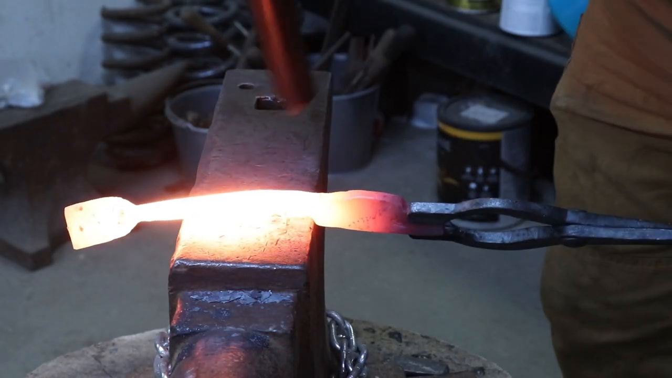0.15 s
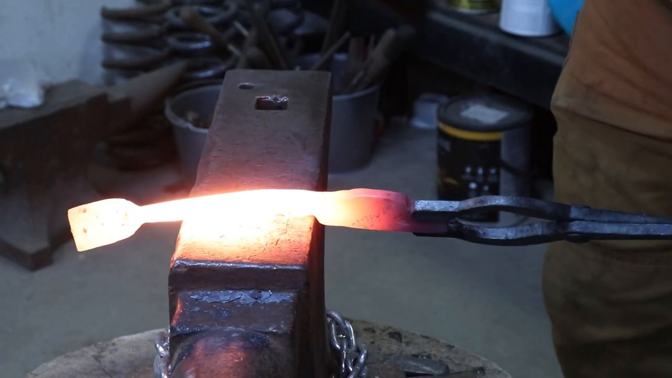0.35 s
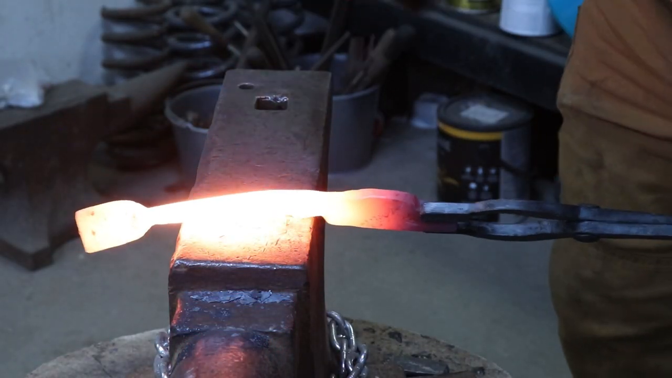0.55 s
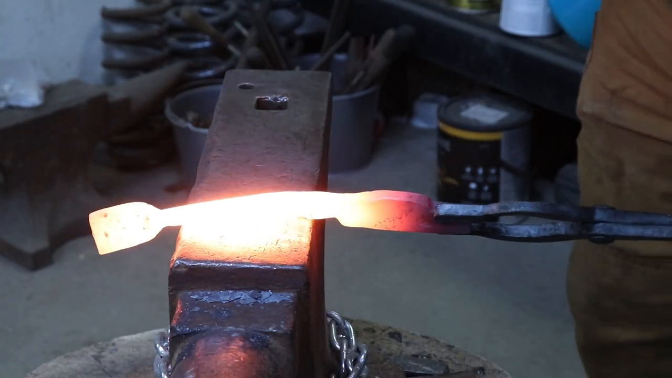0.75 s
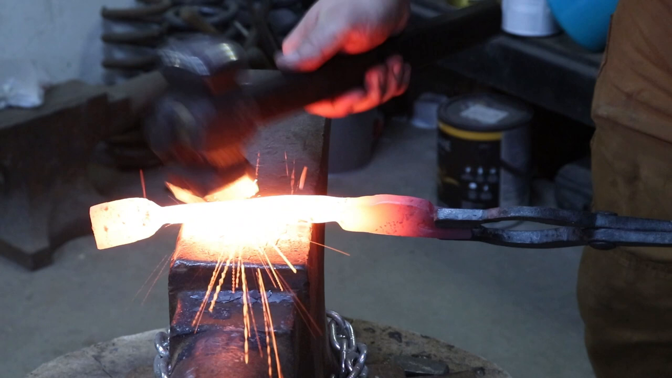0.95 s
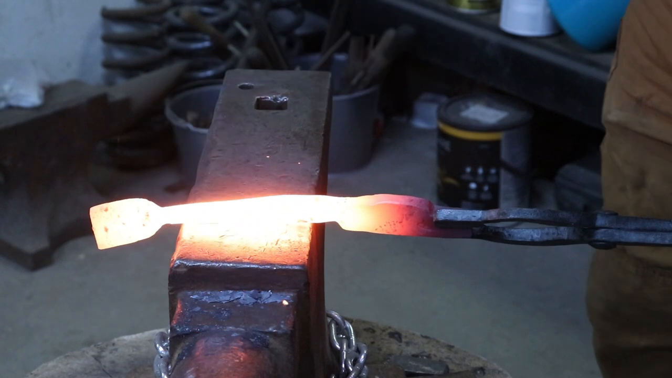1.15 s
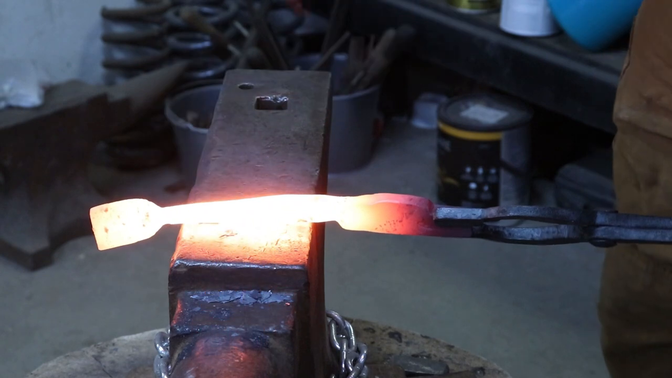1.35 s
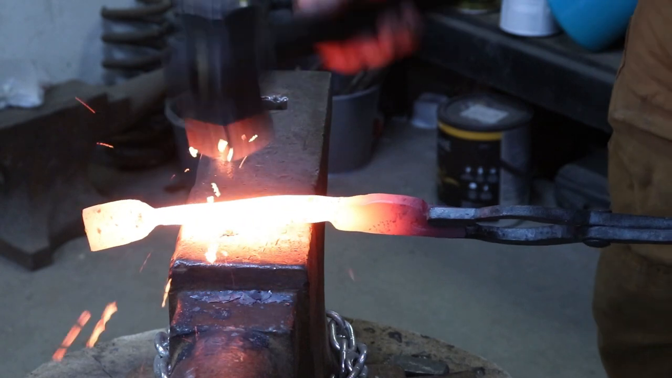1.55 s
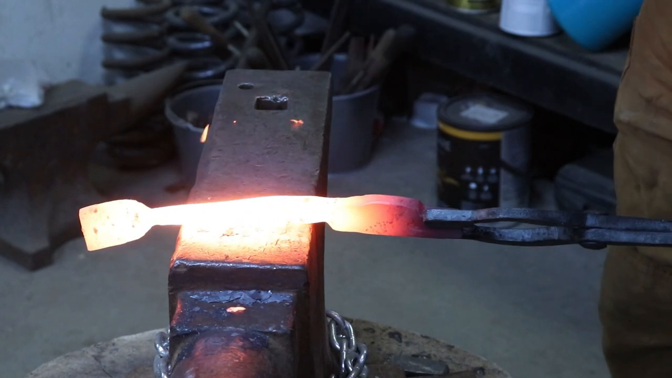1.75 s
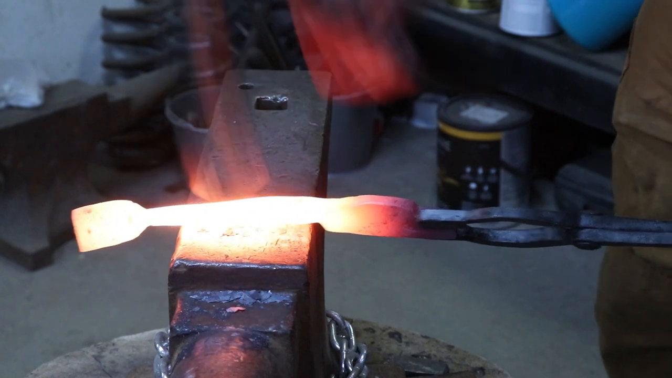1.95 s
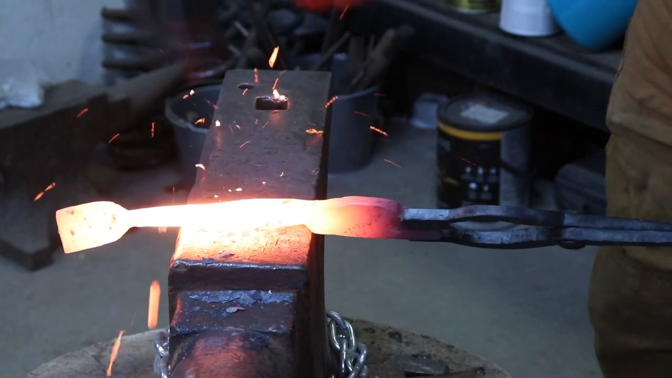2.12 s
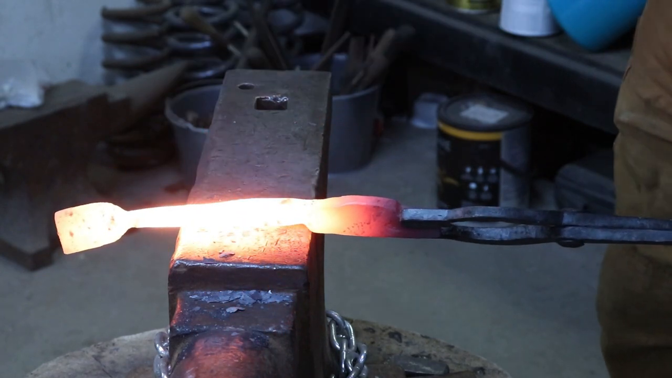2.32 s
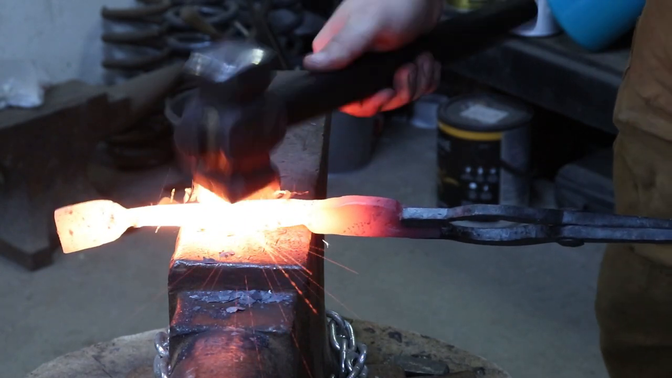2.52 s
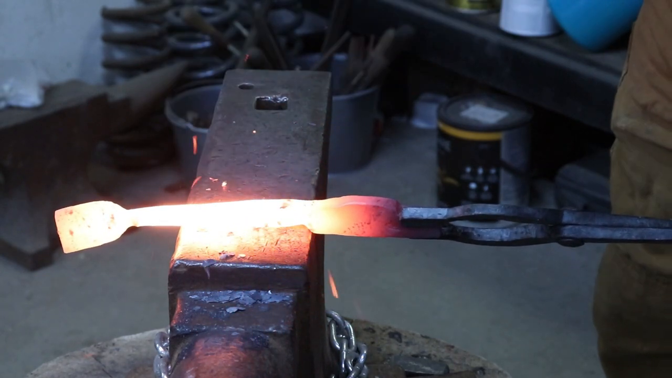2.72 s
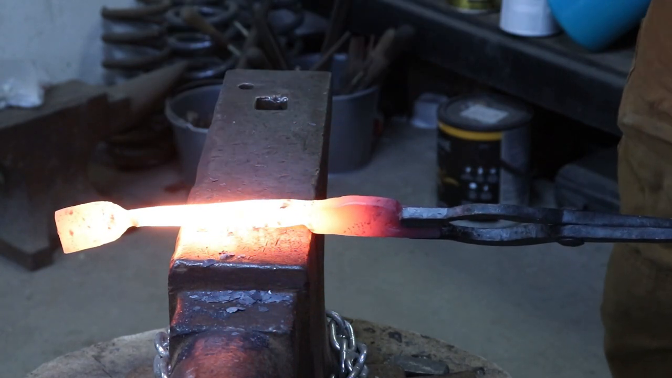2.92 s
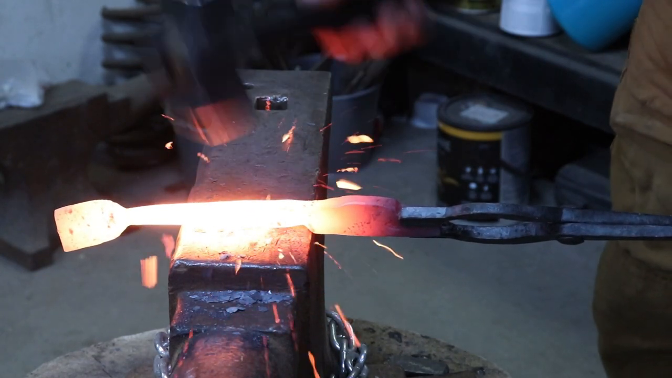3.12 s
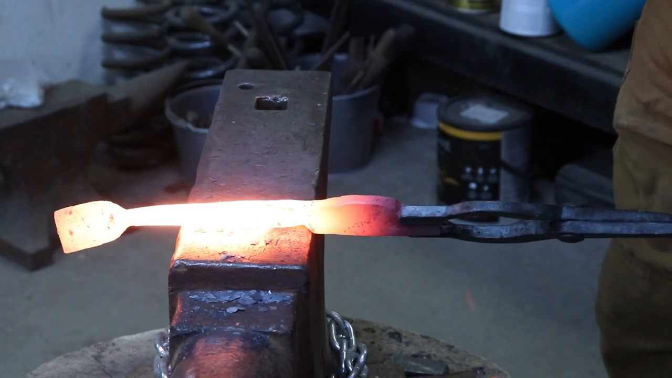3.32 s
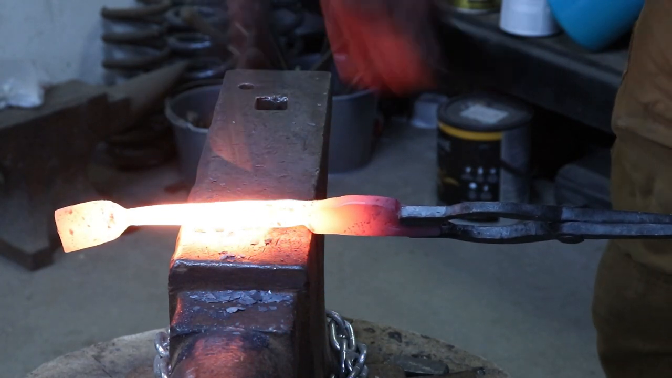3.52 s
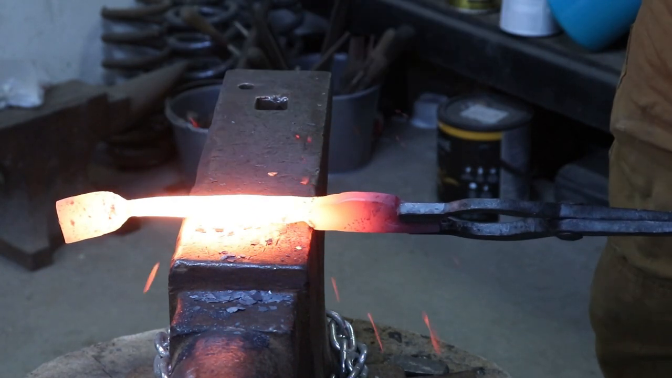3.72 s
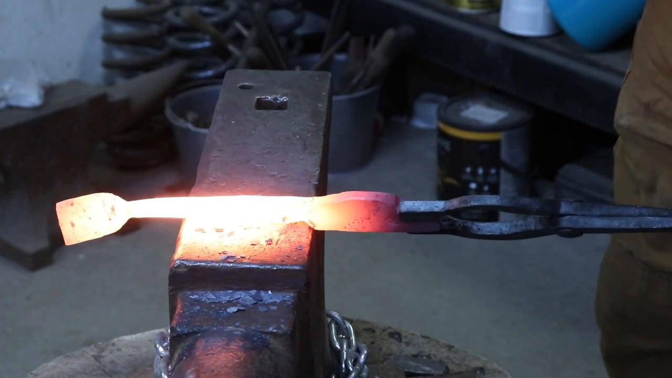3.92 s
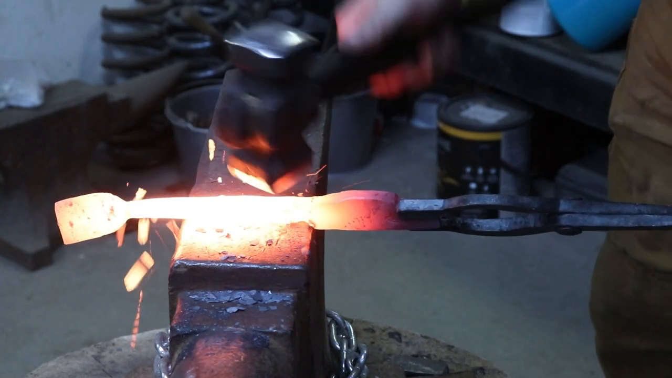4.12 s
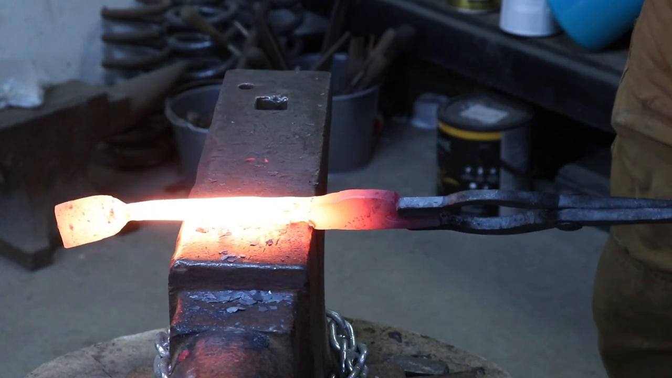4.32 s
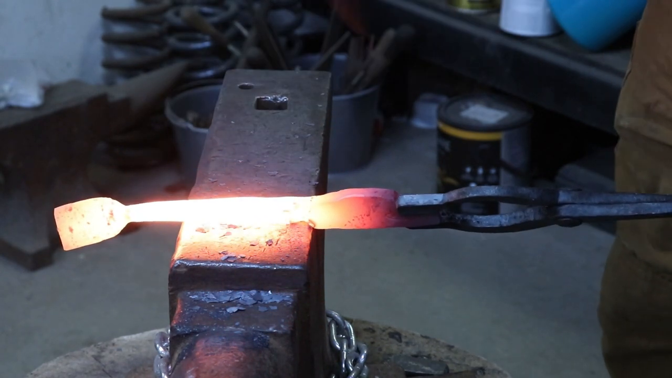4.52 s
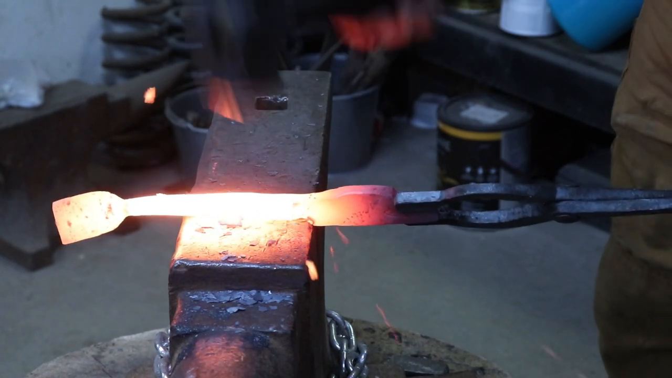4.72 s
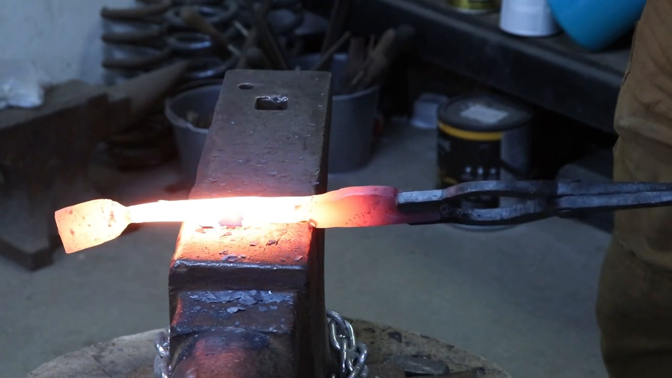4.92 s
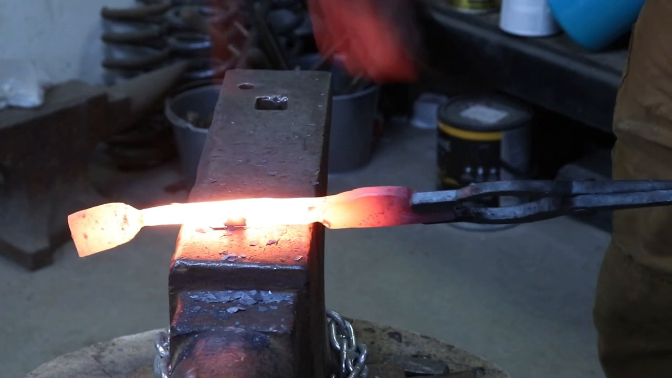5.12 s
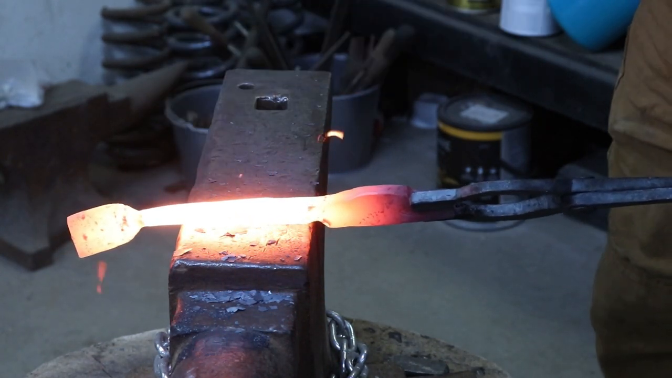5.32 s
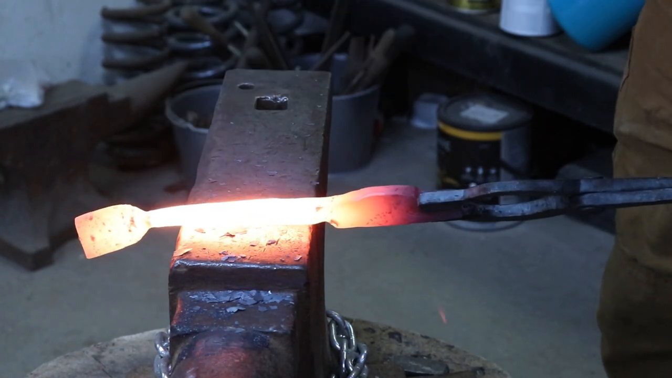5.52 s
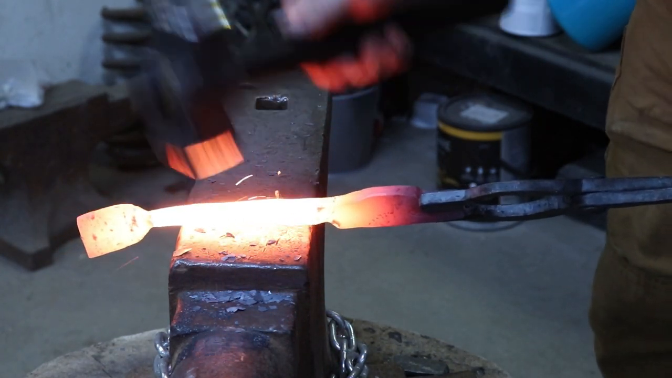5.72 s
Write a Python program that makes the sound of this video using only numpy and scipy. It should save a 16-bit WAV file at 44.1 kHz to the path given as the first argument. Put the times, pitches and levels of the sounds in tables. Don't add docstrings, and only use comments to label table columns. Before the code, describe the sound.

Steady overloaded hammer clanks on an anvil, each with a sharp crack, low thump and short metallic ring, over faint workshop rumble.

```python
import sys
import numpy as np
from scipy import signal
from scipy.fft import rfft, irfft, next_fast_len
from scipy.io import wavfile
from scipy.ndimage import map_coordinates

SR = 44100
rng = np.random.default_rng(int(sys.argv[2]) if len(sys.argv) > 2 else 0)


def field_ratio(decibels):
    return 10 ** (np.asarray(decibels, dtype=float) / 20)


def master_out(mix):
    frames = np.transpose(np.atleast_2d(mix))
    ceiling = np.clip(frames, -1, 1)
    pcm = np.round(ceiling * 32767).astype(np.int16)
    wavfile.write(sys.argv[1], SR, pcm)


N = 254016

# t/s, force/dB, hardness/(dB per octave), spot along and across the face/hand widths
BLOWS = [
    (0.121, -10.5, 2, -0.75, 0.49),
    (1.0302, -6.5, -6, -0.42, 0.18),
    (1.5606, -4.5, -0.56, -.49, -0.82),
    (2.0707, -3.5, -2.5, -0.36, 0.26),
    (2.6049, -3.5, 2.56, 0.52, -0.036),
    (3.1235, -4, 1.35, 0.51, -0.16),
    (3.6429, -4, 0.8, 0.5, -0.13),
    (4.1738, -4, 2.5, 0.27, 0.34),
    (4.711, -3.5, 2.4, 0.3, -0.16),
    (5.2517, -4, 1.5, -0.13, 0.15),
]
NOISE_SPAN = SR * 2 // 3


def along(points, hz):
    f, value = np.transpose(points)
    return np.interp(np.log(hz + 1), np.log(f + 1), value)


def noise(n, spectrum):
    m = next_fast_len(n)
    colour = field_ratio(along(spectrum, np.fft.rfftfreq(m, 1 / SR)))
    x = irfft(rfft(rng.standard_normal(m)) * colour, m)[:n]
    return x / x.std()


def add(track, s, sound):
    i = round(s * SR)
    track[i:i + len(sound)] += sound[:len(track) - i]


def reverberant(x, rise_s, direct):
    # f/Hz, t60/s
    room_decay = [(60, 0.85), (300, 0.53), (1000, 0.5), (4000, 0.52), (8000, 0.42), (15000, 0.38)]
    hz, t, z = signal.stft(x, SR, nperseg=256)
    fade = field_ratio(-60 * t / along(room_decay, hz)[:, None])
    tail = signal.istft(z * fade, SR, nperseg=256)[1][:len(x)]
    build_up = np.exp(-(np.arange(len(x)) / SR / rise_s) ** 2)
    return tail * (1 - (1 - direct) * build_up)


def ring(modes, rise_s, scatter_db, spin, flicker):
    t = np.arange(SR * 3 // 4, dtype=np.float32)[:, None] / SR
    hz, db, t60 = np.transpose(modes).astype(np.float32)
    size, phase = rng.standard_normal((2, len(hz)), dtype=np.float32)
    bumps = np.exp(-(32 * t[::16] - np.arange(24)) ** 2)
    waver = flicker * bumps @ rng.standard_normal((2, 24, len(hz)))
    sway, slip = np.repeat(waver, 16, axis=1)[:, :len(t)].astype(np.float32)
    fade = np.exp(np.float32(np.log(10) / 20) * (db + scatter_db * size - 60 * t / t60))
    lines = fade * (1 + sway) * np.sin(np.float32(2 * np.pi) * hz * t + spin * phase + slip)
    return lines.sum(1) * (1 - np.exp(-t[:, 0] / abs(rise_s)))


def workshop():
    # f/Hz, level/(dB per Hz)
    air = [(20, -28.5), (45, -14.5), (75, 6), (110, -6), (450, -8.5), (1300, -22), (8000, -33),
           (15500, -43)]
    t = np.arange(N) / SR
    drift = map_coordinates(rng.standard_normal(60), [t * 9])
    return field_ratio(-59 + 1.13 * t + 0.6 * drift) * noise(N, air)


def flakes():
    # t/s, level/dB, length/s
    landings = [(0.509, -61, 0.0051), (0.547, -60, .008), (0.654, -74, .008), (0.714, -53, 0.023),
                (0.893, -54, 0.025), (2.438, -62.5, .012), (2.447, -59.5, 0.023), (3.453, -73, 0.0091),
                (3.472, -52, .012), (3.597, -73, 0.0071), (3.96, -69.5, .008), (3.986, -70, .008),
                (4.576, -53.5, 0.013), (5.588, -64.5, 0.007), (5.753, -63, .012)]
    # f/Hz, level/(dB per Hz)
    scrape = [(800, -30), (1600, -1.5), (4000, -5), (8000, -7), (14000, -13.5)]
    track = np.zeros(N)
    t = np.arange(SR // 10) / SR
    for s, db, length_s in landings:
        add(track, s, field_ratio(db - 27 * (t / length_s) ** 3) * noise(len(t), scrape))
    return track


def swing():
    # f/Hz, level/(dB per Hz)
    swish = [(100, -5.5), (300, 6), (1000, -15.5), (3000, -17.5), (6000, -21), (12000, -32)]
    t = np.arange(N) / SR
    ahead_s = np.array(BLOWS)[1:, :1] - t
    speed = (field_ratio(-60 * np.abs(ahead_s) / .5) * (ahead_s > 0)).sum(0)
    return field_ratio(-52.0) * speed * noise(N, swish)


def stand_thump():
    # f/Hz, level/dB, t60/s
    stand = [(71.8, -21.5, 0.34), (171, -20.5, 0.094), (216.9, -15, 0.55), (228.2, -14, 0.52),
             (278.9, -3.5, 0.38), (294, -1.5, 0.27), (321.6, 3.5, 0.088), (300, -13, 0.59),
             (334.2, -11.5, 0.48), (363, -4.5, 0.31), (420.6, -11.5, 0.37), (467, -19.5, 0.14),
             (537.3, -14.5, 0.076), (685.4, -12, 0.28)]
    track = np.zeros(N)
    for s, force_db, *_ in BLOWS:
        add(track, s + 0.002116, field_ratio(force_db) * ring(stand, 0.0042, 0.99, 0.092, 0.01))
    return track


def clank():
    # f/Hz, level/(dB per Hz)
    body = [(40, -26.5), (150, -3), (400, -1), (900, -3), (1600, -3), (2500, -6), (3000, -33.5)]
    track = np.zeros(N)
    walls = noise(NOISE_SPAN, body)
    for s, force_db, *_ in BLOWS:
        answer = reverberant(walls + 0.082 * noise(NOISE_SPAN, body), 0.002, 0.91)
        add(track, s, field_ratio(-9 + 1.253 * force_db) * answer)
    return track


def crack():
    # f/Hz, level/(dB per Hz)
    edge = [(2000, -37), (2700, -5.5), (4000, -5.5), (6000, -8.5), (9000, -12), (12000, -24), (16000, -31)]
    # f/Hz, level/dB, t60/s
    stray = [(3730, -36, .42), (4230, -42, .35), (4580, -36, .45), (5165, -41, .35), (5630, -40, .3),
             (7680, -40, .25), (8260, -44, .4), (8380, -46, .35), (10245, -48, .33), (11020, -52, .3)]
    track = np.zeros(N)
    for s, _, hardness, *_ in BLOWS:
        edge_db = 0.45 * hardness
        add(track, s, field_ratio(-21 + edge_db) * reverberant(noise(NOISE_SPAN, edge), 0.0024, .45))
        add(track, s, field_ratio(3.5 + edge_db) * ring(stray, .012, 3, 3, .4))
    return track


def struck(families, force_db, hardness, x, y):
    # belly level/dB, waves along and across/half waves, offset/half waves
    mode_shapes = [(6.5, -.53, .13, 0.021), (11, 0.67, -.06, .001), (17, 0.21, 0.77, .34),
                   (19, -.75, 0.26, .21), (12.5, -0.4, .41, -0.15), (19, -0.12, 0.0058, -0.36),
                   (7, 0.1, -0.94, 0.11), (10.5, 0.57, -0.2, 0.074)]
    belly_db, waves_x, waves_y, offset = np.transpose(mode_shapes)
    octaves = np.log2([family[0][0] / 1600 for family in families])
    shape = np.cos(np.pi * (waves_x * x + waves_y * y + offset)) ** 2 + .001
    return belly_db + force_db + hardness * octaves + 10 * np.log10(shape)


def anvil_and_bar():
    # f/Hz, level/dB, t60/s
    bend_1 = [(1610.3, -5, .45), (1599.7, -12, .4), (1605.6, -5, .36), (1627.5, -14, .41), (1592, -18, .45),
              (1611.5, -36, 1.3), (1512, -21, .3)]
    bend_2 = [(2444, -18, .6), (2444, -20, .6), (2436, -33, .45)]
    bend_3 = [(3386, -25, .7), (3484, -30, .3)]
    # f/Hz, level/dB, t60/s
    bar = [(2066, -28, .2), (2074, -37, .5)]
    twist = [(6169, -34, .5), (5568, -33, .37), (6774, -37, .35)]
    face = [(8860, -27, .2), (9125, -33, .3), (7490, -38, .2)]
    horn = [(9625, -28, .8), (15056, -50, .6), (15672, -50, .45)]
    heel = [(13575, -26.5, .26), (11465, -38, .3), (11525, -41, .25), (12195, -46, .25), (12720, -48, .25),
            (12853, -47, .4), (14032, -52, .6), (14620, -54, .2)]
    # f/Hz, level/dB, t60/s
    earlier = (3386, -68, .7)
    wavers = (.35, .3, .45, .14, .45)
    # t/s, time until the twins of bend 2 first cancel/s
    bar_rest = [(0.1, 0.51), (2.1, 0.49), (2.6, 0.55), (3.1, 0.27), (5.3, 0.37)]
    upper = (bar, twist, face, horn, heel)
    track = np.zeros(N)
    add(track, 0, ring([earlier], .001, 0, 0, .1))
    for s, *blow in BLOWS:
        first_db, second_db, third_db, *upper_db = struck((bend_1, bend_2, bend_3, *upper), *blow)
        null_s = abs(np.interp(s, *np.transpose(bar_rest)))
        twins = np.add(bend_2, np.outer([1, -1, 0], [1 / (4 * null_s), 0, 0]))
        twins = np.multiply(twins, [1, 1, abs(0.58 + 1.45 * null_s)])
        third = np.multiply(bend_3, [1, 1, 0.99])
        add(track, s + .003, field_ratio(first_db) * ring(bend_1, .013, .8, .12, .1))
        add(track, s, field_ratio(second_db) * ring(twins, 0.015, .8, .1, .07))
        add(track, s, field_ratio(third_db) * ring(third, 0.015, .8, .1, .07))
        for db, family, waver in zip(upper_db, upper, wavers):
            add(track, s, field_ratio(db) * ring(np.multiply(family, [1, 1, 1.015]), .012, 2, 3, waver))
    return track


def scene():
    blows = stand_thump() + clank() + crack() + anvil_and_bar()
    return (workshop() + flakes() + swing() + blows)[None]


def roll_off(x):
    return signal.sosfilt(signal.butter(12, 15690, fs=SR, output="sos"), x)


def record(dry):
    # from t/s, to t/s, level on return/dB, recovery/s
    dropouts = [
        (0.1379, 0.202, -14, 0.042),
        (1.5804, 1.643, -16, 0.019),
        (4.7132, 4.721, -10.5, 0.013),
    ]
    t = np.arange(N) / SR
    x = np.clip(dry, -.95, 1.3)
    for start, end, back_db, recovery_s in dropouts:
        recovering = field_ratio(back_db * np.exp(-np.abs(t - end) / recovery_s))
        gain = np.where(t > end, recovering, 0)
        x = x * np.where(t < start, 1, gain)
    x = signal.lfilter(*signal.butter(1, 100 / (SR / 2), "high"), x)
    return roll_off(np.clip(x, -1, 1))


dry = scene()
out = record(dry)
master_out(out)
```